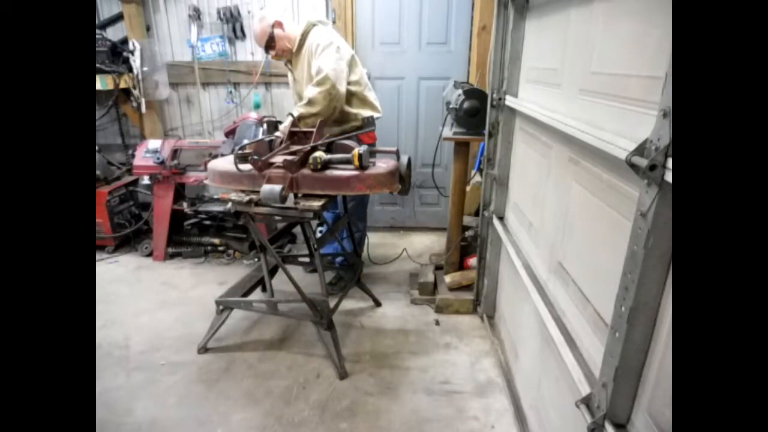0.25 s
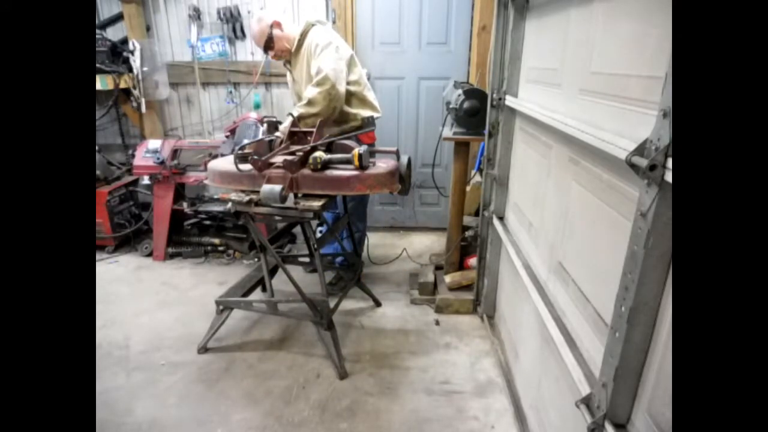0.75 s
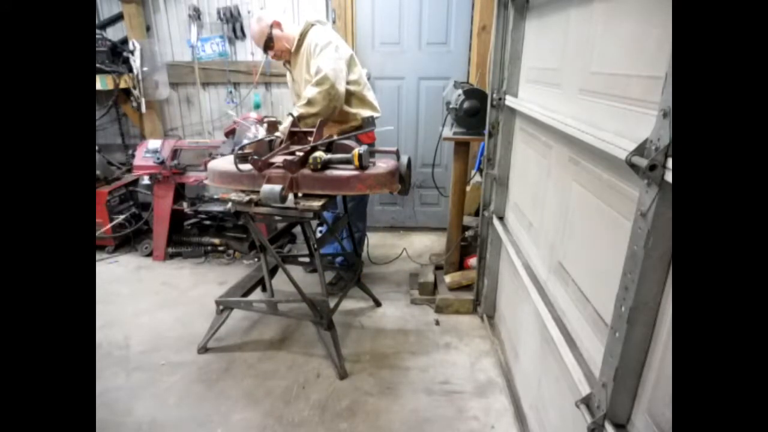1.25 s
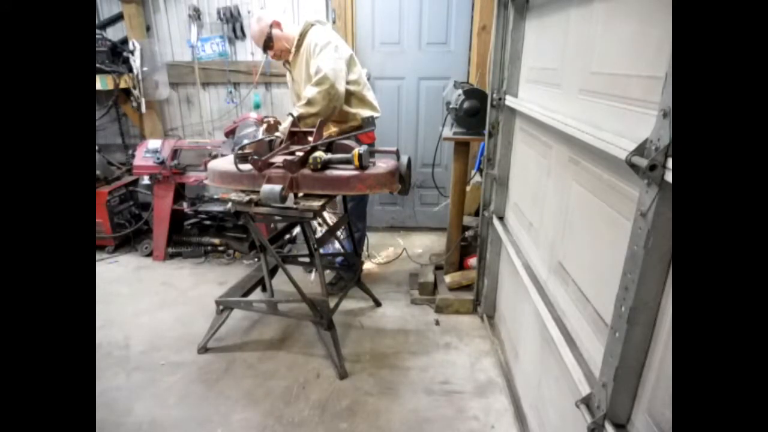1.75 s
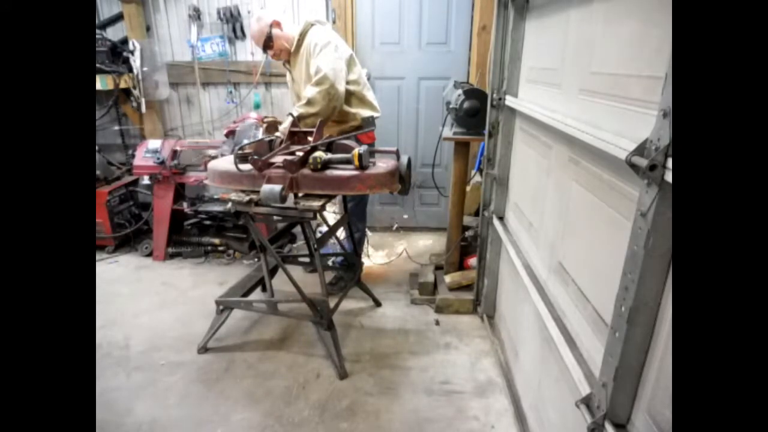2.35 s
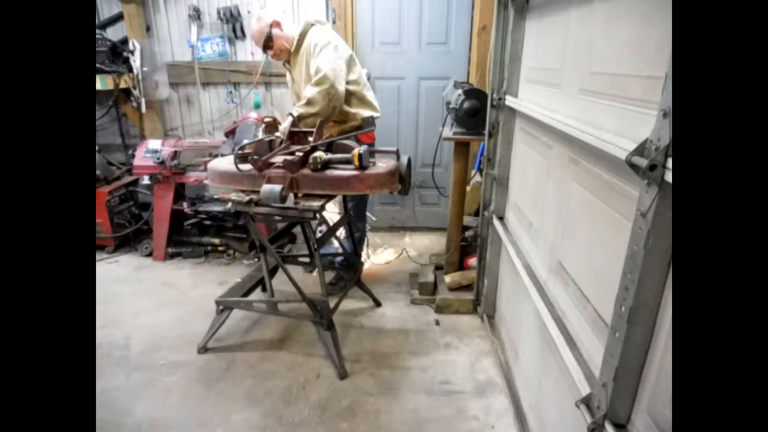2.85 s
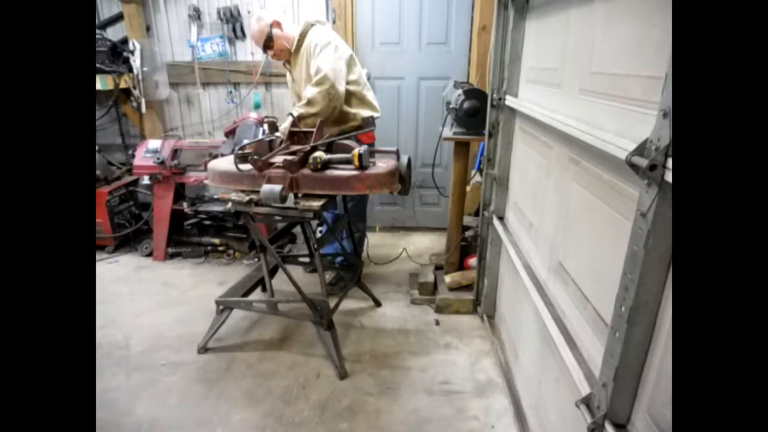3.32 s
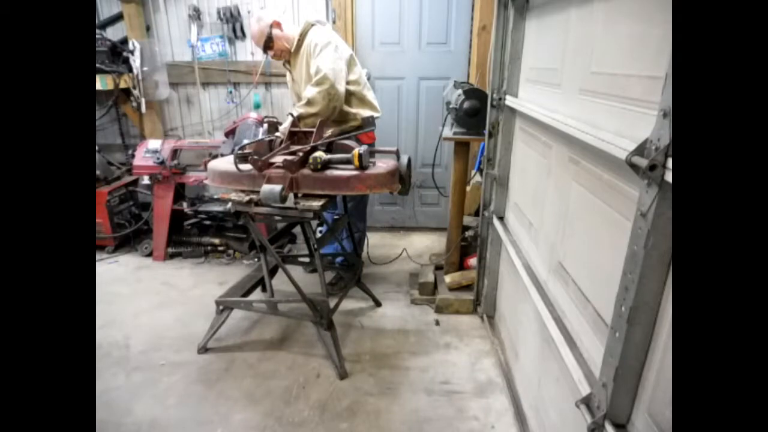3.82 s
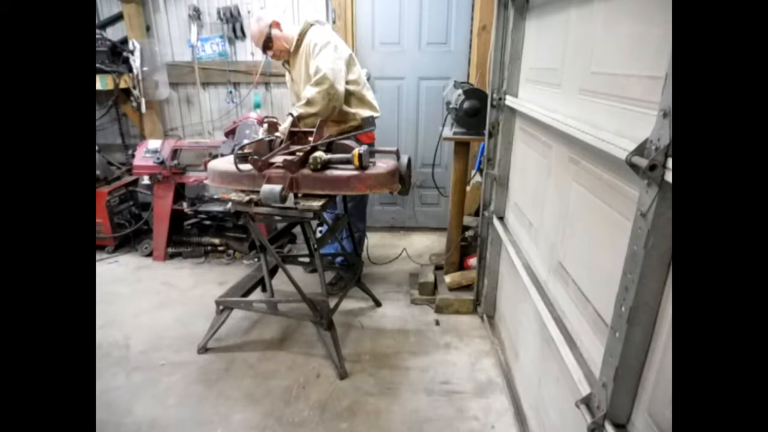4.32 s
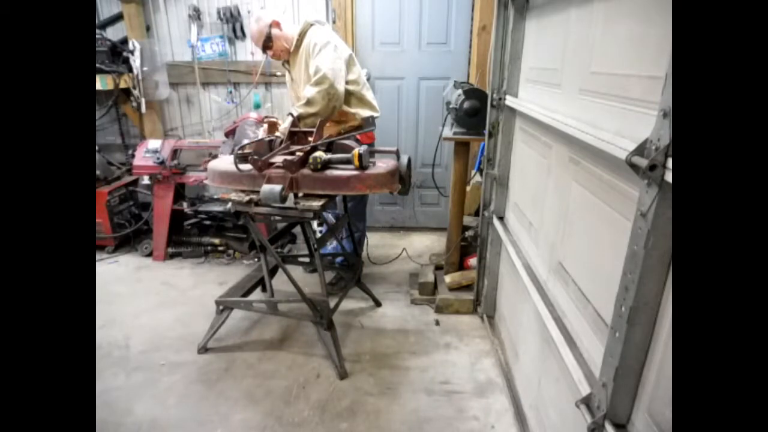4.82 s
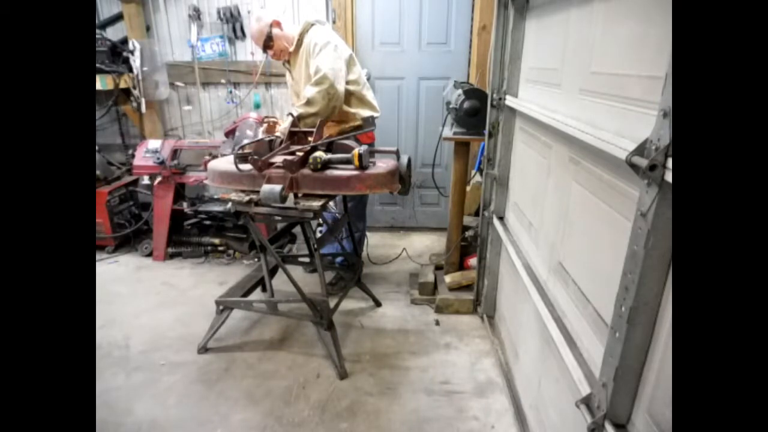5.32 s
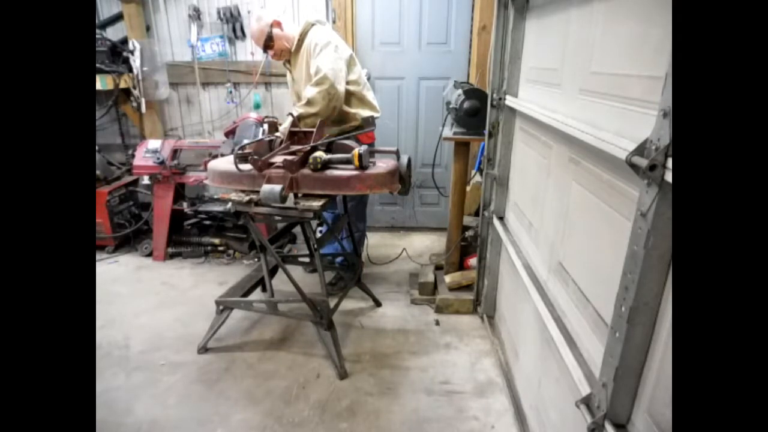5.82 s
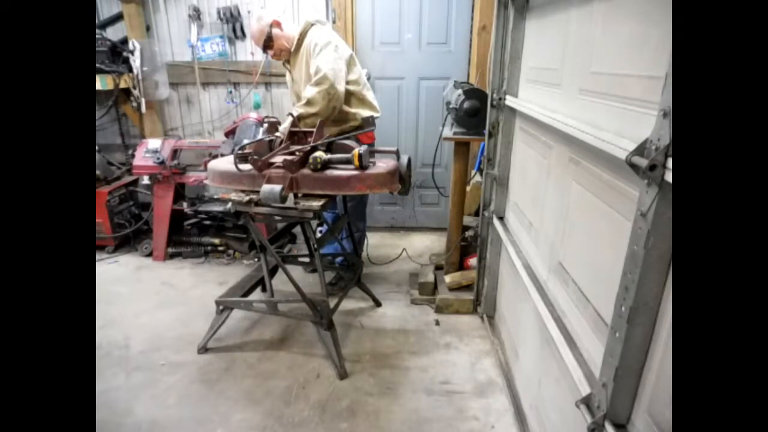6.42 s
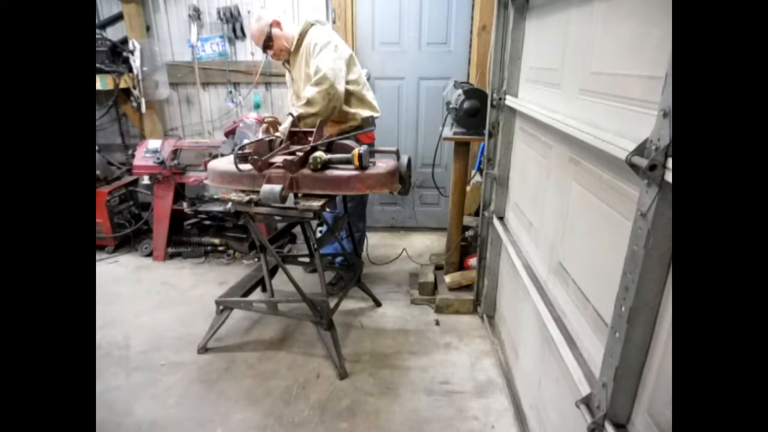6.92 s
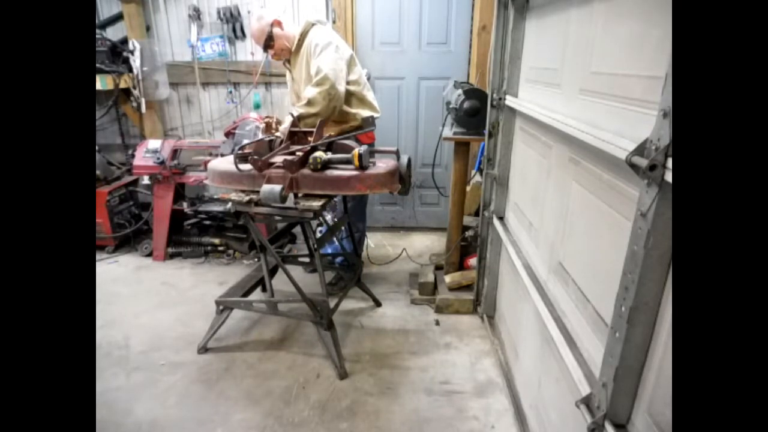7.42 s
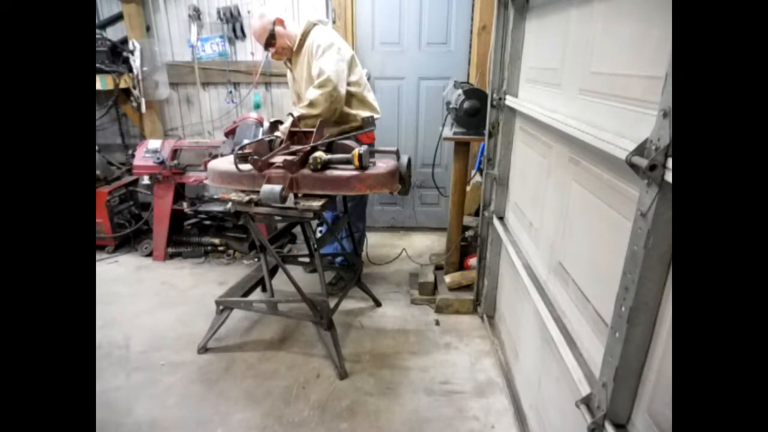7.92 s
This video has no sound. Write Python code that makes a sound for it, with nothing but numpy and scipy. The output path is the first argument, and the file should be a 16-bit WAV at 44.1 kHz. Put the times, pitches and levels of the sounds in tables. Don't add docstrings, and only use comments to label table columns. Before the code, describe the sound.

A pneumatic hand cutter is already running in a hard-walled garage, a dense, bright roar of air with a sharp hiss on top, slightly sputtering. At about 0.6 s the wheel bites a steel bracket: a harsh, gritty grinding screech joins, buzzing and ringing high, its harmonics sliding down as the wheel slows under load, with shifting emphasis until 3.3 s. It lifts off and only rushing air remains for half a second. The second pass runs from 3.8 to 5.75 s, sagging faster, with a strong shrill surge near 4.6 s. Air alone again, then a lighter third pass from 6.1 to 7.65 s, starting thin, growing more piercing around 7 s and fading in force. The free air hiss continues to the end at about 8 s. Diffuse room reflections surround everything; the small distant microphone sounds fizzy, loud and slightly overloaded, with dulled extreme highs.

```python
import sys
import numpy as np
from scipy import signal
from scipy.fft import rfft, irfft, next_fast_len
from scipy.io import wavfile
from scipy.ndimage import uniform_filter1d, map_coordinates

SR = 44100
rng = np.random.default_rng(int(sys.argv[2]) if len(sys.argv) > 2 else 0)


def magnitude_from_level(level_db):
    exponent = np.asarray(level_db, float) / 20
    return 10 ** exponent


def file_out(sig):
    cols = np.atleast_2d(sig).T
    lim = np.clip(cols, -1, 1)
    pcm = np.round(lim * 32767).astype(np.int16)
    wavfile.write(sys.argv[1], SR, pcm)


N = 359856


def unit(x):
    return x / np.sqrt(np.mean(np.abs(x) ** 2) + 1e-20)


def along(points, hz):
    f, v = np.transpose(points)
    return np.interp(np.log(hz + 1), np.log(f + 1), v)


def curves(rows):
    s, *cols = np.transpose(rows)
    return [np.interp(np.arange(N) / SR, s, c) for c in cols]


def wobble(knots_per_s):
    knots = rng.standard_normal(int(N * knots_per_s / SR) + 4)
    return map_coordinates(knots, [np.arange(N) * knots_per_s / SR])


def filtered(x, response):
    m = next_fast_len(N + 8192)
    return irfft(rfft(x, m) * response(np.fft.rfftfreq(m, 1 / SR)), m)[..., :N]


# (time [s], push [dB], lean [dB], throttle [dB])
HAND_PASSES = [
    [(.57, -15, -10, -1), (.8, -8, -11, 3.5), (1.08, 3.5, -9, 0.5), (1.3, -3, -1, 0.5), (1.53, -3, 5, -1.5),
     (1.8, 0, 1.5, 0.5), (2.4, -2.5, 4.5, -1), (2.75, -2, 0, 0), (3.29, -6, 3.5, -1.5)],
    [(3.82, -10, -2, -3), (4.1, -1, -1, -0.5), (4.38, -2.5, 5, -0.5), (4.5, -3, -3, -1),
     (4.6, 9.5, -6, -1.5), (4.77, -3, -6, 1.5), (5.1, 3, -2.5, 1.5), (5.55, 2, -7, 1.5), (5.73, -6, 1, -1)],
    [(6.13, -8, 6, -3), (6.3, -8, 5, 1), (6.5, -3, -3, 3), (6.6, -16, -4, 0.5), (6.78, 1, -1, -0.5),
     (6.95, 3, -1, -0.5), (7.15, 3, -4, 1.5), (7.35, -0.5, -1, -0.5), (7.64, -8, -2, -1.5)],
]
HAND = np.concatenate(HAND_PASSES)
# (time [s], speed [turns/s])
SPEED_PASSES = [
    [(0.58, 172.4), (0.98, 170.1), (1.28, 166), (1.49, 162.6), (1.99, 156.9), (2.39, 154.9), (2.64, 153.1),
     (3.0, 153.8), (3.3, 150.5)],
    [(3.8, 168.5), (4.0, 167.9), (4.19, 164.6), (4.58, 156.1), (4.73, 155.3), (4.97, 151.5), (5.16, 152.4),
     (5.36, 150.8), (5.75, 152)],
    [(6.1, 168.4), (6.29, 167.4), (6.48, 165.4), (6.68, 165.2), (6.87, 161.3), (7.06, 158.7), (7.26, 156.5),
     (7.5, 156.7), (7.65, 158.7)],
]
FREE_TURNS_PER_S, SAG_TURNS_PER_S = 172, 20
BITE_S, LIFT_S = 0.033, 0.012


def contact():
    t = np.arange(N) / SR
    touch = np.zeros(N)
    for hand in HAND_PASSES:
        start, end = hand[0][0], hand[-1][0]
        touch += np.interp(t, [start, start + BITE_S, end - LIFT_S, end], [0, 1, 1, 0])
    speed, = curves(np.concatenate(SPEED_PASSES))
    return touch, speed, touch * (FREE_TURNS_PER_S - speed) / SAG_TURNS_PER_S


def rush(spectrum, patchy_db):
    z = signal.stft(rng.standard_normal(N), nperseg=512)[2]
    field = uniform_filter1d(rng.standard_normal(z.shape), 5, 0)
    field = uniform_filter1d(field, 12, 1)
    x = signal.istft(z * magnitude_from_level(patchy_db * unit(field)), nperseg=512)[1][:N]
    return unit(filtered(x, lambda hz: magnitude_from_level(along(spectrum, hz))))


# (frequency [Hz], density [dB per Hz])
ROAR_SPECTRUM = [(150, -40), (400, -17), (1400, -6.5), (2140, -4), (2540, -2), (3620, -1.5), (4500, -2),
                 (6100, -4.5), (8200, -7), (11700, -13), (19800, -120)]
# (frequency [Hz], density [dB per Hz])
HISS_SPECTRUM = [(1800, -28), (3000, -23), (3700, -6), (5500, -1.5), (7000, -3), (8200, -3.5), (9700, -1),
                 (11000, -3), (12600, -9), (13500, -8.5), (15700, -7)]
# (frequency [Hz], width [Hz], level [dB])
AIR_PASSAGES = [(2464, 380, -10.5), (3635, 970, -8)]
ROAR_DB, HISS_DB = -20.5, -20.5
CHOKE_DB, STARVE_DB, MUFFLE_DB = 3, 1, 1
AFTER_LIFT_DB, AFTER_LIFT_S = -0.5, 0.091


def passages(f):
    return 1 + sum(magnitude_from_level(db) * 1j * f * w / (c * c - f * f + 1j * f * w) for c, w, db in AIR_PASSAGES)


def jet(chatter_db):
    touch, _, load = contact()
    since_lift_s = np.arange(N) / SR - np.array([[p[-1][0]] for p in HAND_PASSES])
    after_lift_db = AFTER_LIFT_DB * np.sum((since_lift_s > 0) * np.exp(-np.abs(since_lift_s) / AFTER_LIFT_S), axis=0)
    throttle_db = curves(HAND)[2]
    roar_db = ROAR_DB - CHOKE_DB * touch - STARVE_DB * load + after_lift_db
    roar_db += touch * (throttle_db - chatter_db)
    sputter_db = 0.45 * wobble(6.5) + 0.13 * wobble(14) + 2.22 * wobble(90)
    air = unit(filtered(rush(ROAR_SPECTRUM, patchy_db=0.03), passages))
    hiss_db = HISS_DB - MUFFLE_DB * touch + 0.4 * wobble(5.7)
    hiss = magnitude_from_level(hiss_db) * rush(HISS_SPECTRUM, patchy_db=0.6)
    return magnitude_from_level(roar_db + sputter_db) * air + hiss


def grit(speed, wear_per_s, even_db, loose):
    rows, orders, steps = 200, 96, 1024
    drift = np.cumsum(rng.normal(0, 1, (rows, orders)), axis=0)
    phase = 2 * np.pi * rng.random(orders) + drift
    z = magnitude_from_level(rng.normal(0, 3.4, (rows, orders))) * np.exp(1j * phase)
    z[:, ::2] *= magnitude_from_level(even_db)
    rim = irfft(z, steps, axis=1)
    angle = np.cumsum(speed) / SR % 1 * steps
    age = np.arange(N) / SR * wear_per_s
    turning = map_coordinates(np.c_[rim, rim[:, :1]], [age, angle], order=1)
    chips = filtered(rng.standard_normal(N), lambda hz: (hz / 6000) ** 1.5)
    return unit(turning) + loose * chips


def mode(x, hz, width_hz):
    ring = filtered(x, lambda f: (1j * f * width_hz / (hz * hz - f * f + 1j * f * width_hz)) ** 2)
    return ring / np.sqrt(np.abs(uniform_filter1d(ring ** 2, size=3500)) + 1e-12)


# (frequency [Hz], width [Hz])
STEEL_MODES = [(6070, 590), (7670, 510), (4575, 360), (8790, 170),
               (3880, 220), (6700, 160), (8050, 460), (10300, 450)]
# (level [dB], push share, lean share, load [dB])
STEEL_DRIVE = [(-26.5, 0.84, 0, -0.5), (-32.5, 0.37, .9, 8.5), (-33.5, 0.28, 0, -3), (-38.5, 0, .2, 2),
               (-39, 0.16, 0.52, 7), (-37, .1, 0, -3), (-33.5, 0, 0.6, 3), (-35.5, .1, 0.25, -10)]
# (third steel mode [dB], fourth steel mode [dB])
PASS_LEVELS = [
    (0, 5),
    (-5.5, 0),
    (-5, -4),
]
# (frequency [Hz], width [Hz], level [dB])
WAVERING_MODES = [(5210, 88, -46), (12650, 1100, -40.5)]
# (frequency [Hz], level [dB])
SCRAPE_SPECTRUM = [(1000, -43), (2500, -28), (4000, -6), (8000, 2), (11000, -14), (15000, -5.5)]
SHIMMER_DB, SHIMMER_KNOTS_PER_S = 1.25, 6


def cut(chatter_db):
    touch, speed, load = contact()
    push_db, lean_db, _ = curves(HAND)
    levels_db = []
    for db, push, lean, load_db in STEEL_DRIVE:
        hand_db = push * push_db + lean * lean_db
        shimmer_db = SHIMMER_DB * wobble(SHIMMER_KNOTS_PER_S)
        levels_db.append(db + hand_db + load_db * (load - 0.5) + shimmer_db)
    pass_rows = [(p[k][0], *db) for p, db in zip(HAND_PASSES, PASS_LEVELS) for k in (0, -1)]
    third_db, fourth_db = curves(pass_rows)
    levels_db[2] = levels_db[2] + third_db
    levels_db[3] = levels_db[3] + fourth_db

    force = grit(speed, wear_per_s=8, even_db=2, loose=0.6)
    ring = np.zeros(N)
    for (hz, width_hz), db in zip(STEEL_MODES, levels_db):
        ring += magnitude_from_level(db + 1.0) * mode(force, hz, width_hz)
    for hz, width_hz, db in WAVERING_MODES:
        ring += magnitude_from_level(db + 3.5 * wobble(3.96)) * mode(force, hz, width_hz)
    scrape = magnitude_from_level(-23) * unit(filtered(force, lambda hz: magnitude_from_level(along(SCRAPE_SPECTRUM, hz))))
    return touch * magnitude_from_level(chatter_db) * (ring + scrape)


# (frequency [Hz], t60 [s])
GARAGE_T60 = [(500, 0.79), (4000, 0.66), (12000, 0.61)]


def garage(x):
    hop = SR // 10
    count = len(x) // hop + 2
    hz, t, z = signal.stft(rng.standard_normal((count, 2, SR // 3)), SR, nperseg=256)
    decay = magnitude_from_level(-60 * t / along(GARAGE_T60, hz)[:, None])
    tails = signal.istft(z * decay, SR, nperseg=256)[1]
    tails /= np.linalg.norm(tails, axis=-1, keepdims=True)
    padded = np.pad(x, (hop, 3 * hop))
    fade = np.sin(np.pi * np.arange(2 * hop) / (2 * hop))
    out = np.zeros((2, len(padded) + SR))
    for k, tail in enumerate(tails):
        start = k * hop
        piece = signal.fftconvolve((padded[start:start + 2 * hop] * fade)[None], tail, axes=1)
        out[:, start:start + piece.shape[1]] += piece
    return out[:, hop:hop + len(x)]


CHATTER_DB, CHATTER_KNOTS_PER_S = 0.5, 7


def scene():
    chatter_db = CHATTER_DB * wobble(CHATTER_KNOTS_PER_S)
    tool = jet(chatter_db) + cut(chatter_db)
    lead = SR // 2
    wet = garage(np.r_[tool[lead:0:-1], tool])[:, lead - 100:lead - 100 + N]
    lag_s = 8e-6 * np.array([[1], [-1]])
    direct = filtered(tool, lambda hz: np.exp(-2j * np.pi * hz * lag_s))
    return magnitude_from_level(-3.5) * direct + wet


def low_pass(x):
    return signal.sosfilt(signal.butter(12, 15735, fs=SR, output="sos"), x)


# (frequency [Hz], level [dB])
CAPSULE_RESPONSE = [(30, -1.5), (3000, 1), (9000, -4), (13000, -6.5), (15700, -13)]


def record(dry):
    fizz = filtered(rng.standard_normal(dry.shape), lambda hz: 1 / (1 + (hz / 3000) ** 2))
    x = dry + magnitude_from_level(-19.0) * fizz
    x = x / (1 + np.abs(x / 0.34) ** 4) ** (1 / 4)
    x = filtered(x, lambda hz: magnitude_from_level(along(CAPSULE_RESPONSE, hz)))
    return low_pass(x)


dry = scene()
out = record(dry)
file_out(out)
```